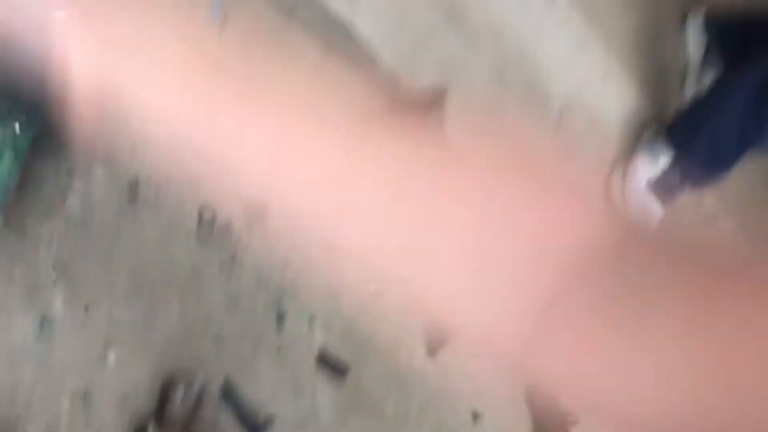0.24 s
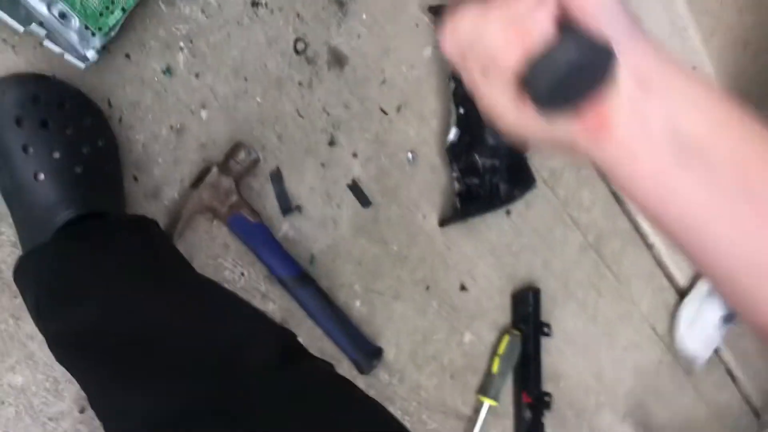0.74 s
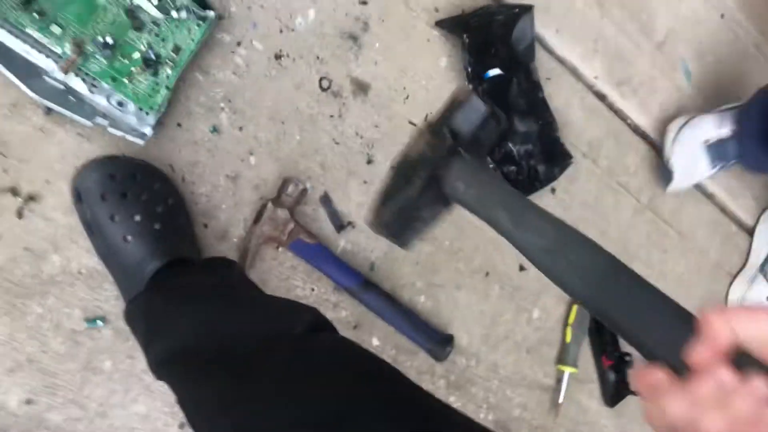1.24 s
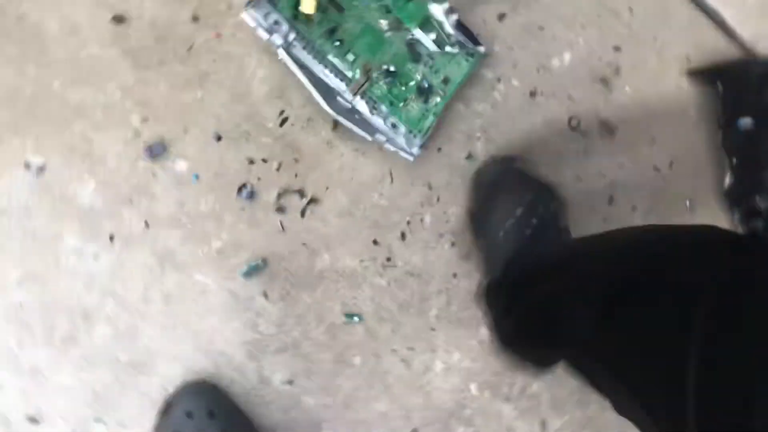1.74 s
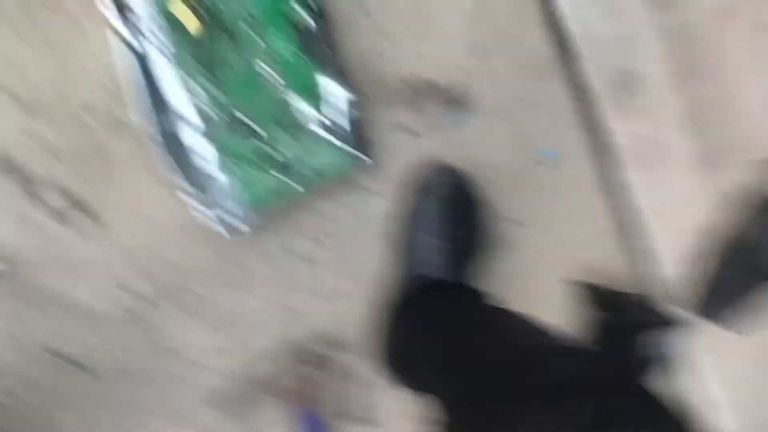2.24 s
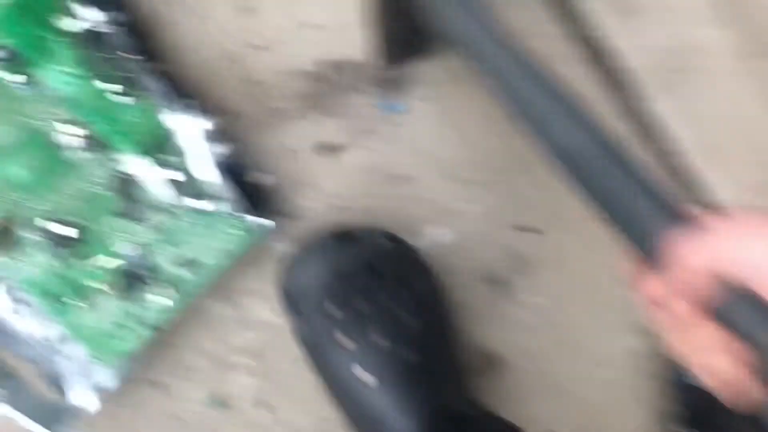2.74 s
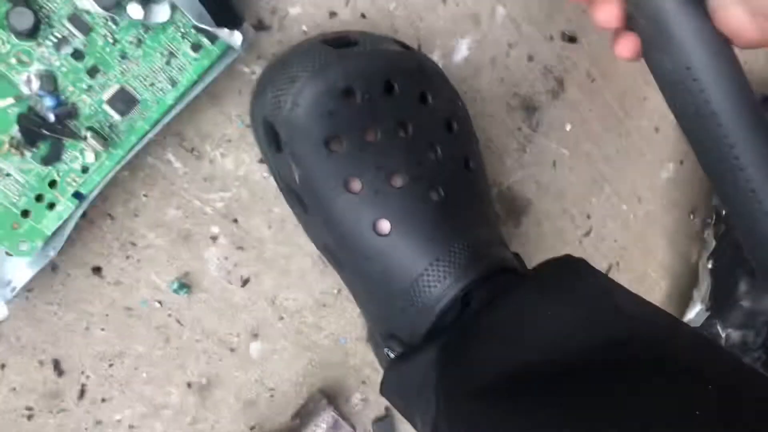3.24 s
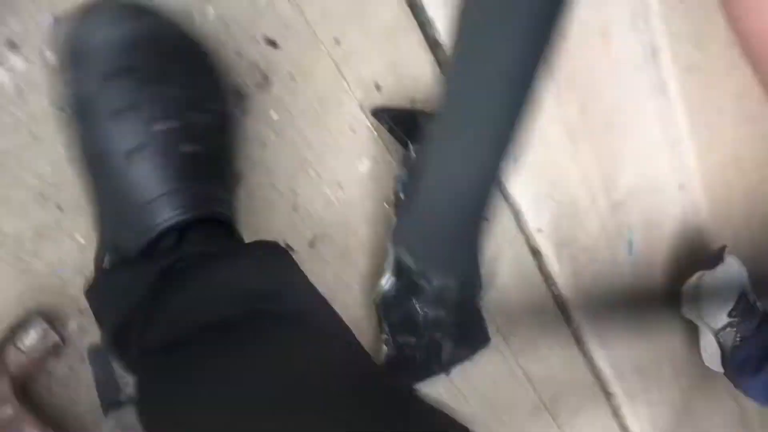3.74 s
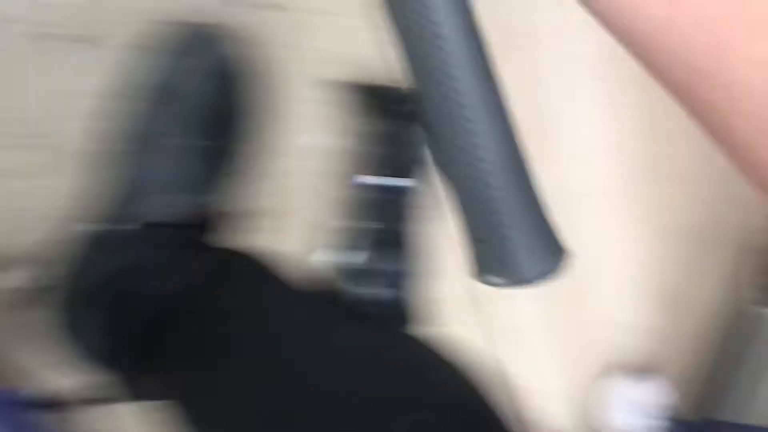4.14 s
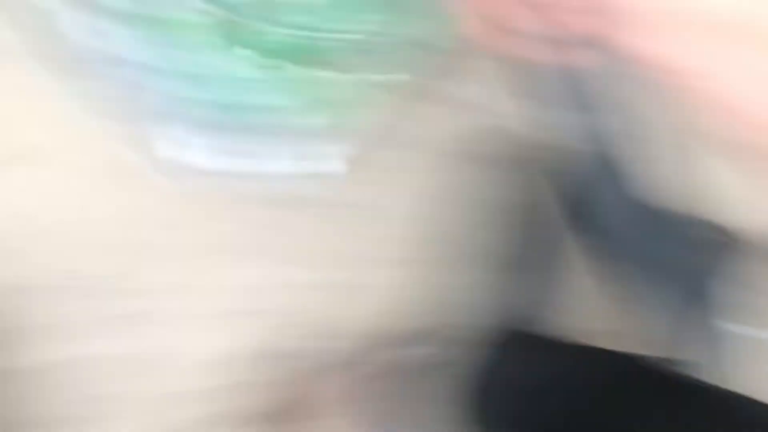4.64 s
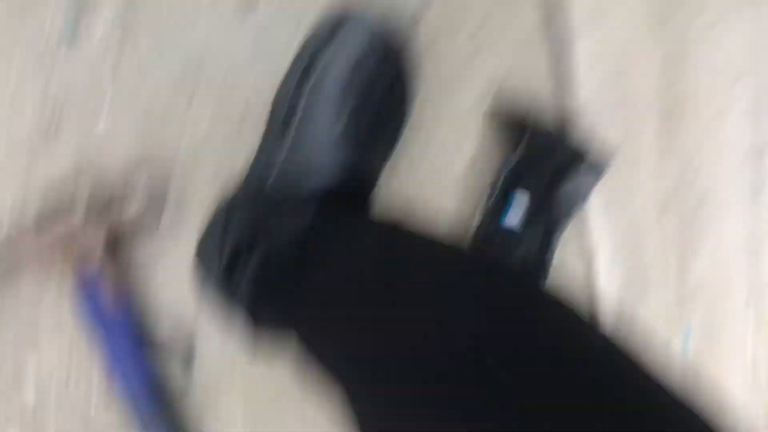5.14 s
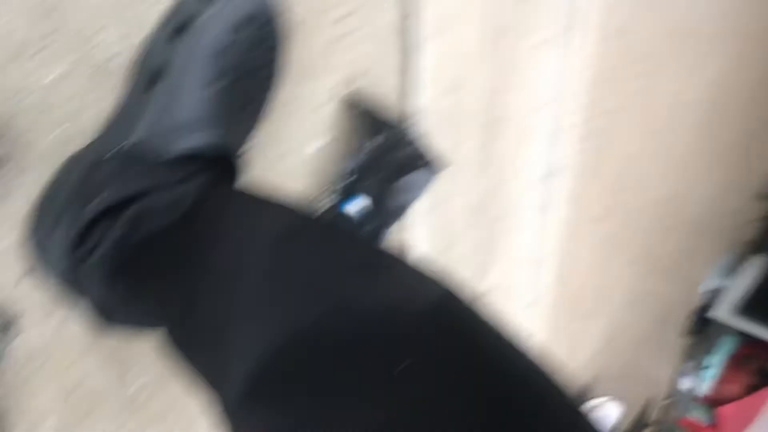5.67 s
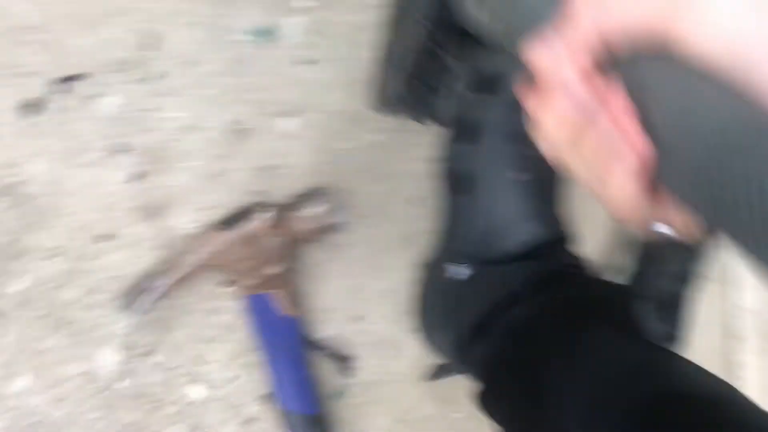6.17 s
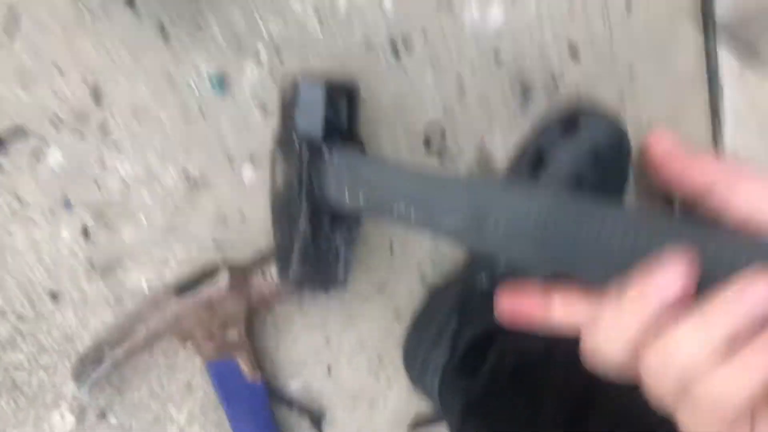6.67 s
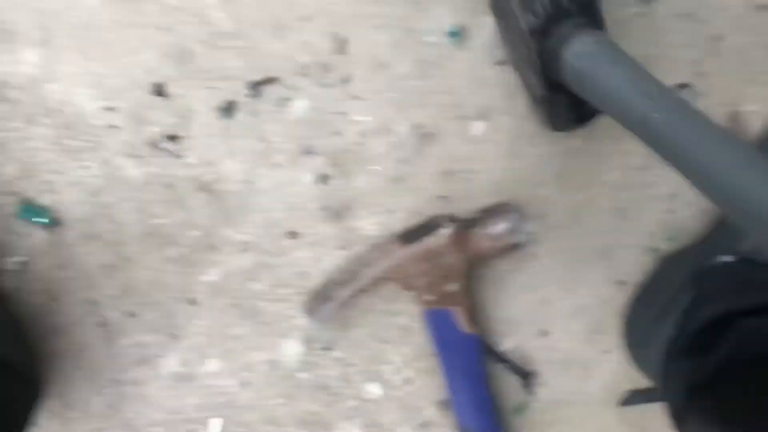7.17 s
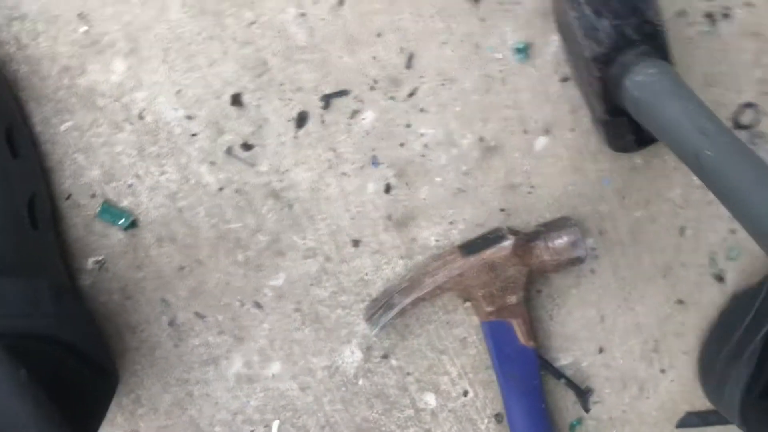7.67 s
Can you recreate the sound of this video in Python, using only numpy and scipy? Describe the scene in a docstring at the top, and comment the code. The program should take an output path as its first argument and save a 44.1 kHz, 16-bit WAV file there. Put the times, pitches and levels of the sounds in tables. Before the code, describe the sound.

In a garage, a hammer cracks a plastic case and bits skitter over the concrete. After a few seconds of light ticks, shoe scuffs and a small creak, three more blows land in quick succession, each scattering shards. The hammer head then clinks on steel and is set down with a soft clonk, and plastic rattles briefly. The close hand-held phone picks up handling thumps and a low room hum.

```python
"""In a garage, a club hammer smashes a plastic case on the concrete floor, a metre from a hand-held phone.
Each blow cracks the shell and makes it ring. Bits of plastic tick, skitter and creak,
shoes scuff in the grit, and the hammer head clinks on steel before it is set down.
Every jolt of the hand thumps and knocks through the phone body, over the low hum of the room."""
import sys
import numpy as np
from scipy import signal
from scipy.fft import rfft, irfft
from scipy.io import wavfile
from scipy.ndimage import uniform_filter1d

SR = 44100
rng = np.random.default_rng(int(sys.argv[2]) if len(sys.argv) > 2 else 0)


def bounce(signal):
    """Save signal as a 16-bit WAV file at the path given by the first command-line argument."""
    frames = np.transpose(np.atleast_2d(signal))
    limited = np.clip(frames, -1, 1)
    pcm = np.round(limited * 32767).astype(np.int16)
    wavfile.write(sys.argv[1], SR, pcm)


N = 348831

# the tone of the room's hum and hiss: (frequency [Hz], level [dB])
ROOM_TONE = [(15, -45.5), (25, -23), (97, -6.5), (127, -4), (256, -28), (439, -28), (754, -21), (1230, -27),
             (5000, -44.5), (7110, -44), (16000, -48.5)]
# how strongly the microphone picks up lows and highs: (frequency [Hz], gain [dB])
MIC_TONE = [(30, -4), (60, 13), (5500, -1.5), (6800, -4.5), (7600, -20.5), (9000, -4), (10500, -28),
            (16000, -27.5)]
# the hand shifting on the phone: (time [s], level [dB])
GRIP_LEVELS = [(0.0, -43.5), (1.43, -53.5), (3.65, -43.5), (3.99, -33.5), (4.4, -42.5), (4.63, -30.5),
               (5.0, -51), (5.42, -36.5), (5.82, -46), (6.57, -37.5), (7.42, -55), (7.91, -37.5)]
# the tone of that rumble: (frequency [Hz], level [dB])
GRIP_TONE = [(25, -12), (55, 2.5), (90, -3.5), (125, 2), (170, -9.5), (300, -14.5), (600, -22),
             (2000, -44.5), (8000, -74.5)]
# thumps through the phone body: (time [s], level [dB], pitch [Hz])
JOLTS = [(0.09, -22, 122), (.154, -5, 100), (0.175, -8.5, 320), (0.209, -18, 159), (.265, -15, 126),
         (1.12, -23.5, 307), (1.362, -34.5, 249), (1.429, -38.5, 300), (1.539, -41, 352),
         (1.914, -20.5, 207.4), (2.309, -35.5, 295), (2.527, -25, 88), (2.678, -16, 313), (2.718, -23, 114),
         (2.767, -27.5, 221), (2.783, -24.5, 104), (2.889, -32.5, 243), (3.149, -37.5, 530),
         (3.618, -39.5, 295), (3.839, -32, 300), (3.936, -5.5, 176), (3.962, -17, 94), (3.995, -11.5, 133),
         (4.076, -29, 90), (4.095, -17, 117), (4.144, -33, 149), (4.289, -16.5, 134), (4.493, -22, 286),
         (4.542, -8, 188), (4.573, -3.5, 128), (4.604, 2.5, 93), (4.625, -7, 77), (4.667, 0.5, 105),
         (4.702, -2.5, 91), (4.789, -16, 52), (4.847, -35.5, 93.6), (4.998, -41, 357), (5.049, -37.5, 400),
         (5.086, -28.5, 94), (5.123, -27, 102), (5.206, -23, 402), (5.227, -12.5, 93.4), (5.321, -4.5, 101),
         (5.347, -2, 340), (5.365, -15, 112), (5.383, -12.5, 110), (5.441, -14.5, 121), (5.506, -19, 69),
         (5.589, -25, 114), (6.349, -15, 117), (6.519, -40, 306), (6.661, -31, 281), (6.793, -31.5, 249),
         (6.723, -23, 302), (6.882, -30.5, 332), (7.007, -22.5, 133.5), (7.18, -39.5, 305), (7.7, -30, 258),
         (7.841, -10.5, 160), (7.905, -9.5, 163)]
# soles and fingers dragging: (time [s], length [s], level [dB], pitch [Hz], fine grit on top [dB])
SCUFFS = [(0.026, 0.12, -39.5, 1000, -31), (0.729, 0.071, -45, 1442, -12.5),
          (1.425, 0.048, -53.5, 2560, -5.5), (1.711, 0.12, -45, 1010, -15.5), (2.527, 0.068, -42, 2670, -5),
          (2.604, 0.087, -42.5, 1760, -5), (3.133, 0.031, -46.5, 1390, -4),
          (3.449, 0.097, -49, 2900, -13.5), (3.58, 0.058, -39.5, 2300, -2), (3.616, 0.059, -46, 900, -16),
          (3.699, 0.14, -39, 1860, 0.5), (3.815, 0.051, -48.5, 790, -2), (4.305, 0.095, -37.5, 1040, -9),
          (4.416, 0.061, -39, 1440, -4.5), (5.283, 0.019, -54.5, 1500, 0), (5.724, 0.027, -43.5, 820, -7),
          (5.826, 0.13, -37, 1120, -12), (5.914, 0.068, -38, 1610, -2), (6.055, 0.031, -41, 910, -12),
          (6.104, 0.054, -41, 1120, -32), (6.201, 0.15, -45.5, 2590, -10),
          (6.722, 0.038, -39.5, 1300, -11.5), (6.813, 0.029, -42.5, 1150, -13),
          (6.958, 0.011, -40.5, 1260, -9), (7.72, 0.065, -50.5, 3200, -3)]
# hollows ringing under a sole: (frequency [Hz], width [Hz], level [dB])
SOLE_RINGS = [(2350, 730, -0.5), (3700, 250, -3), (5740, 200, -4.5)]
# tiny slips of plastic under load: (time [s], level [dB])
CREAK_SLIPS = [(3.099, -32.5), (3.105, -36.5), (3.116, -39.5), (3.123, -33), (3.133, -28), (3.137, -32),
               (3.142, -28.5), (3.148, -26), (3.156, -33)]
# the notes of the creaking piece: (frequency [Hz], level [dB], fade time [s])
CREAK_NOTES = [(760, 0, .024), (1400, -3, .012), (3600, -2, .005)]
# shards sent sliding by a blow or a foot: (time [s], level [dB], time until they settle [s])
SCATTERS = [(0, -58.5, 0.17), (.15, -29.5, .7), (1.9, -62.5, .5), (2.45, -56.5, 0.32), (2.65, -51, 0.55),
            (3.1, -69, 0.33), (3.501, -49, 0.56), (3.93, -31, 0.19), (4.1, -39.5, 0.49), (4.558, -31, 0.34),
            (5.31, -35.5, 0.3), (5.75, -58.5, .3), (6.0, -53.5, 0.4), (6.34, -42.5, 0.23),
            (6.65, -63, 0.86), (7.568, -48, 0.091), (7.725, -53.5, .2)]
# the tone of sliding shards: (frequency [Hz], level [dB])
SHARD_TONE = [(240, -30), (400, -9), (626, -3.5), (753, 0.5), (4240, -6), (6500, -16), (7510, -38),
              (8900, -32), (16000, -63.5)]
# larger shards ringing: (frequency [Hz], width [Hz], level [dB])
SHARD_RINGS = [(640, 60, -5), (1290, 90, -6), (2280, 50, -6), (2520, 35, -9), (4230, 90, -12)]
# sharp ticks of plastic, dull knocks on the phone: (time [s], level [dB], pitch [Hz], click on top [dB])
TICKS_AND_KNOCKS = [(0.23, -12, 2450, -8), (.257, -14.5, 2360, -4), (0.268, -10, 2280, -1),
                    (.37, -20.5, 1940, -15), (0.403, -25.5, 1450, -8), (0.506, -23.5, 2220, 5),
                    (0.518, -37, 1280, -10), (.557, -7.5, 2080, -4.5), (.615, -26, 2290, -5),
                    (0.628, -25.5, 2200, 9), (.745, -28, 2500, 12), (0.811, -42, 2470, -11),
                    (1.051, -38.5, 3940, -11), (1.116, -27, 337, -36), (1.629, -27, 980, -27),
                    (1.938, -38.5, 1360, 13), (2.029, -38.5, 2800, -3), (2.183, -39.5, 820, 5.5),
                    (2.675, -12.5, 970, -17.5), (2.743, -26, 1200, 5), (3.773, -22.5, 2320, -5),
                    (3.99, -19, 2530, 4), (4.095, -17.5, 1400, 6), (4.128, -19, 2180, 1),
                    (4.176, -18, 1690, -31.5), (4.23, -23, 1340, -1), (4.242, -20, 1600, -36),
                    (4.286, -23.5, 1150, -37), (4.54, -13, 710, -41), (4.662, -15.5, 600, -29),
                    (4.877, -34, 2500, -7), (4.901, -24.5, 2480, 12), (4.933, -31.5, 2500, -14),
                    (5.149, -30, 850, -8), (5.22, -26.5, 880, -18), (5.346, -2, 850, -15),
                    (5.357, -8, 850, -12), (5.434, -14.5, 4570, 3), (5.677, -31, 1050, 16),
                    (5.712, -42, 1250, 2), (5.774, -30, 2180, 13), (5.985, -22.5, 2600, 7),
                    (6.266, -23, 2487, -6), (6.279, -22, 2490, -6), (6.305, -19.5, 2770, -4),
                    (6.413, -20.5, 690, -35), (6.579, -45, 3950, 3.5), (6.948, -40, 1380, -13),
                    (7.58, -28.5, 4200, -12.5), (7.591, -26.5, 2600, -11), (7.611, -28, 2980, -12),
                    (7.619, -23, 2980, -14), (7.623, -28, 2600, -12), (7.633, -21.5, 2600, -13),
                    (7.645, -26, 2800, -14), (7.656, -27, 3750, -8), (7.669, -22.5, 2950, -22),
                    (7.674, -26.5, 1850, -18), (7.685, -29.5, 3420, -12), (7.839, -16, 520, -28)]
# steel hitting steel: (time [s], level [dB], the short bar's share [0-1])
CLINKS = [(6.341, -1, 0.26), (6.383, -20, 0.8), (6.429, -17.5, 0.96)]
# the notes of the hammer head: (frequency [Hz], level [dB], fade time [s])
HEAD_NOTES = [(800, -8, .025), (2735, -11, .07), (3200, -6, .04), (3700, -1, .04), (4300, -4, .04),
              (5599, -7, .3), (5650, -6, .07), (5932, -8, .15)]
# the notes of the short steel bar: (frequency [Hz], level [dB], fade time [s])
BAR_NOTES = [(800, -3, .025), (2350, -5, .025), (3198, -9, .03), (4425, 0, .045)]
# the hammer being set down on the floor: (time [s], level [dB])
SET_DOWN = [(7.001, -27.5), (7.023, -29)]
# the notes of its hollow clonk: (frequency [Hz], level [dB], fade time [s])
CLONK_NOTES = [(640, 0, .04), (720, -3, .05), (2800, -14, .012)]
# hammer blows on the case: (time [s], level [dB], crushing time [s], shell ring on top [dB])
BLOWS = [(0.147, 2.5, 0.0054, -7.5), (3.929, 0, 0.0085, -4.5), (4.563, 2, 0.011, -8),
         (5.3087, 3.5, 0.0073, -6.5)]
# the notes of the plastic shell: (frequency [Hz], level [dB], fade time [s])
SHELL_NOTES = [(640, 0, .07), (1340, -10, .05), (2100, -5, .04), (2480, -6, .05), (3760, -8, .03)]
# the tone of plastic being crushed: (frequency [Hz], level [dB])
CRUSH_TONE = [(240, -30), (400, -18.5), (655, -8), (879, -8), (1290, -4), (4310, -7.5), (9040, -12.5),
              (16000, -51)]


def undb(db):
    """Turns decibels into a number to multiply by."""
    return 10 ** (np.asarray(db) / 20)


def unit(x):
    """Scales a sound to an average strength (rms) of 1."""
    return x / np.sqrt(np.mean(x ** 2))


def colour(x, tone):
    """Turns lows and highs up or down to follow a tone table."""
    hz, db = np.transpose(tone)
    size = 4096
    grid_hz = np.arange(size // 2 + 1) * SR / size + 1
    log_gain = np.interp(np.log(grid_hz), np.log(hz), db) * np.log(10) / 20
    # fold the filter so that it rings only after a hit, never before
    folded = irfft(log_gain)
    folded[1:size // 2] *= 2
    folded[size // 2 + 1:] = 0
    response = irfft(np.exp(rfft(folded)))[:size // 2]
    return signal.fftconvolve(x, response)[:len(x)]


def band(x, lo_hz, hi_hz, order=2):
    """Keeps the sound between two frequencies; a higher order cuts more sharply."""
    for _ in range(order):
        x = signal.lfilter(*signal.butter(1, [lo_hz, min(hi_hz, SR / 2.2)], "band", fs=SR), x)
    return x


def fade(t, fade_s):
    """Dies away by 60 dB over the fade time."""
    return np.exp(-np.log(1000) * t / max(fade_s, .003))


def ring(notes, t, spread_db, detune):
    """The fading notes of a struck object, a little different on every hit."""
    chance = rng.standard_normal((len(notes), 2))
    return sum(undb(db + spread_db * a) * fade(t, fade_s) * np.sin(2 * np.pi * hz * (1 + detune * b) * t)
               for (hz, db, fade_s), (a, b) in zip(notes, chance))


def add(out, start_s, x, peak_db):
    """Mixes a sound in at the given time and peak level."""
    i = int(start_s * SR)
    x = x[:N - i]
    out[i:i + len(x)] += undb(peak_db) * x / np.max(np.abs(x))


def wander(per_s, count=N):
    """Glides from one random value to the next, per_s times a second."""
    step = int(SR / per_s)
    return uniform_filter1d(np.repeat(rng.standard_normal(count // step + 1), step), step)[:count]


def grains(count, per_s, spread_db, fade_s):
    """Noise broken into short, raspy grains of uneven size."""
    hits = (rng.random(count) < per_s / SR) * undb(spread_db * rng.exponential(size=count).clip(0, 4))
    tail = fade(np.arange(int(.02 * SR)) / SR, fade_s)
    power = signal.fftconvolve(hits ** 2, tail ** 2)[:count].clip(1e-12)
    return unit(np.sqrt(power) * rng.standard_normal(count))


def room_hum():
    """The steady hum and hiss of the garage."""
    return undb(-58) * unit(colour(rng.standard_normal(N), ROOM_TONE))


def garage_echo(x):
    """The floor and walls throw back a short, slightly dull echo."""
    t = np.arange(int(.6 * SR)) / SR
    tail = band(rng.standard_normal(len(t)), 200, 7900, order=1) * fade(t, 0.3) * (t > .004)
    return undb(-20.5) * signal.fftconvolve(x, tail / np.sqrt(np.sum(tail ** 2)))[:N]


def grip_rumble():
    """Fingers press on the phone in small, uneven pushes."""
    db = np.interp(np.arange(N) / SR, *np.transpose(GRIP_LEVELS))
    pushes = rng.standard_normal(N) * undb(4 * wander(25))
    return undb(db) * unit(colour(pushes, GRIP_TONE))


def hand_jolts():
    """A shudder builds in the phone and dies away, falling in pitch; its case knocks as it lets go."""
    out, lead_s = np.zeros(N), .012
    t = np.arange(int(.2 * SR)) / SR - lead_s
    for s, db, hz in JOLTS:
        pitch = 40 + (hz - 40) * np.exp(-np.clip(t * np.sqrt(hz) * 11, -1.6, None))
        pitch *= 1 + 4.3 * uniform_filter1d(rng.standard_normal(len(t)), size=100)  # random wobble
        phase = 2 * np.pi * np.cumsum(pitch) / SR
        phase -= phase[int(lead_s * SR)]
        rise = np.exp(t / 0.0021) * (1 + t / lead_s)
        fall = fade(t, 0.066 * (130 / hz) ** 0.1)
        shudder = -np.sin(phase) * np.where(t < 0, rise, fall)
        knock = unit(band(rng.standard_normal(len(t)), 190, 560, order=3)) * np.exp(-np.abs(t) / 0.0075)
        add(out, s - lead_s, shudder + undb(-16.5 - 0.27 * db) * knock, db)  # light jolts rustle more
    return out


def scuffs():
    """Dragging over a rough surface makes a hollow rasp with fine grit on top; low drags are duller."""
    out = np.zeros(N)
    for s, length_s, db, hz, fine_db in SCUFFS:
        t = np.arange(int((length_s + .012) * SR)) / SR
        # the pressure swells and eases, catching on bumps
        pressure = np.abs(np.sin(np.pi * t / t[-1])) ** 1.5 * undb(2.9 * wander(46, len(t)))
        hollow = unit(band(grains(len(t), 1100, 2.5, 0.012), hz / 2.67, hz * 1.94, order=3))
        top_hz = 4700 if hz < 1450 else 11000
        grit = grains(len(t), 700, 3.2, .012)
        rings = sum(undb(ring_db) * unit(band(grit, ring_hz - width / 2, ring_hz + width / 2, order=1))
                    for ring_hz, width, ring_db in SOLE_RINGS if ring_hz < top_hz)
        fine = unit(unit(band(grit, 2100, top_hz, order=3)) + 1.8 * rings)
        i = int((s - .004) * SR)
        out[i:i + len(t)] += (undb(db) * pressure * (hollow + undb(fine_db) * fine))[:N - i]
    return out


def plastic_creak():
    """Plastic under load sticks and slips; each slip makes the same piece ring."""
    out, t = np.zeros(N), np.arange(int(.05 * SR)) / SR
    for s, db in CREAK_SLIPS:
        slip = band(rng.standard_normal(len(t)), 400, 4400) * fade(t, .007)
        piece = ring(CREAK_NOTES, t, spread_db=2.5, detune=.05)
        add(out, s, signal.fftconvolve(slip, piece)[:len(t)], db)
    return out


def skitter_db():
    """How loud the shards are: each scatter swells, slowly loses energy, then settles fast."""
    rise_s, slide_db_per_s, settle_db_per_s = 0.021, 50.5, 199.5
    clock = np.arange(0, N, 64) / SR
    power = undb(-71.5) ** 2  # stray grit goes on quietly
    for s, db, slide_s in SCATTERS:
        t = clock - s
        fall_db = slide_db_per_s * t.clip(0) + settle_db_per_s * (t - slide_s).clip(0)
        power = power + (np.clip(t / rise_s, 0, 1) * undb(db - fall_db)) ** 2
    return np.interp(np.arange(N) / SR, clock, 10 * np.log10(power))


def skittering_shards():
    """Bits of plastic and grit make many tiny hits; large pieces ring, and fast ones sound brighter."""
    db = skitter_db()
    rings = sum(undb(ring_db) * unit(band(grains(N, 200, 3.5, 0.03), hz - width / 2, hz + width / 2, 1))
                for hz, width, ring_db in SHARD_RINGS)
    sizzle = band(grains(N, 270, 2.7, 0.014), 3000, 15000, order=1)
    bright = unit(colour(sizzle, MIC_TONE)) * undb(0.7 * (db + 37.5) - 8.5)
    loudness = undb(db + 1.5 * wander(34))
    patter = unit(colour(grains(N, 800, 3.8, 0.014), SHARD_TONE))
    return loudness * (patter + rings + bright)


def ticks_and_knocks():
    """Sharp ticks of plastic and dull knocks on the phone: each rings briefly around its own pitch."""
    out, t = np.zeros(N), np.arange(int(.12 * SR)) / SR
    for s, db, hz, click_db in TICKS_AND_KNOCKS:
        noise = rng.standard_normal(len(t))
        attack = hz / 2200 * fade(t, 0.0045)  # higher ones start more sharply
        body = band(noise * (attack + fade(t, 0.039)), hz / 1.7, hz * 1.83)
        click = band(noise * (attack + fade(t, 0.028)), 2500, 16000, order=1)
        add(out, s, unit(body) + undb(click_db) * unit(click), db)
    return out


def steel_clinks():
    """A sharp tap rings both the hammer head and a short steel bar."""
    out, t = np.zeros(N), np.arange(int(.4 * SR)) / SR
    for s, db, bar_share in CLINKS:
        tap = band(rng.standard_normal(len(t)), 3000, 5000) * fade(t, .022)
        head = ring(HEAD_NOTES, t, spread_db=0.42, detune=.001)
        bar = ring(BAR_NOTES, t, spread_db=.5, detune=.001)
        add(out, s, (1 - bar_share) * (9 * tap + head) + bar_share * bar, db)
    return out


def hammer_set_down():
    """The hammer scrapes the concrete as it is set down and gives a hollow clonk."""
    out, t = np.zeros(N), np.arange(int(.4 * SR)) / SR
    for s, db in SET_DOWN:
        scrape = rng.standard_normal(len(t)) * fade(t, 0.024)
        clonk = ring(CLONK_NOTES, t, spread_db=1.5, detune=0.0065)
        add(out, s, signal.fftconvolve(scrape, clonk)[:len(t)], db)
    return out


def hammer_blows():
    """The shell keeps cracking while the hammer crushes it, and the cracks make it ring."""
    out, t = np.zeros(N), np.arange(int(.4 * SR)) / SR
    squeak_hz, squeak_s = 1500, 0.012  # a thin tone just before each blow lands
    lead = t[t < squeak_s]
    phase = 2 * np.pi * squeak_hz * lead
    squeak = lead * (np.sin(phase) + 0.9 * np.sin(2 * phase))
    for s, db, crush_s, shell_db in BLOWS:
        crushing = np.minimum(t / 0.0013, 1) * np.where(t < crush_s, 1, fade(t - crush_s, 0.056))
        cracks = rng.standard_normal(len(t)) * (crushing + 0.054 * fade(t, 0.9))
        crunch = unit(colour(cracks, CRUSH_TONE))
        notes = ring(SHELL_NOTES, t, spread_db=4.3, detune=0.025)
        shell = unit(signal.fftconvolve(cracks * fade(t, .03), notes)[:len(t)])
        smack = unit(band(cracks * fade(t, 0.029), 4000, 15000, order=1))  # steel meets plastic
        add(out, s, crunch + undb(-2) * smack + undb(shell_db) * shell, db)
        add(out, s - squeak_s, squeak, peak_db=-31)
    return out


def scene():
    """Mixes it all: the hits echo in the garage; the hand's jolts and rumble do not."""
    hits = hammer_blows() + steel_clinks() + hammer_set_down() + ticks_and_knocks()
    picked_up = colour(hits + garage_echo(hits) + scuffs() + plastic_creak(), MIC_TONE)
    return (picked_up + skittering_shards() + hand_jolts() + grip_rumble() + room_hum())[None]


def record(dry):
    """The phone drops the deepest bass, squashes the loudest peaks and cuts the highest treble."""
    bass_cut = signal.butter(2, 30, "high", fs=SR, output="sos")
    treble_cut = signal.ellip(10, .2, 70, 16000, fs=SR, output="sos")
    trimmed = signal.sosfilt(bass_cut, dry)
    squashed = trimmed / (1 + trimmed ** 4) ** .25
    return signal.sosfilt(treble_cut, squashed)


dry = scene()
out = record(dry)
bounce(out)
```